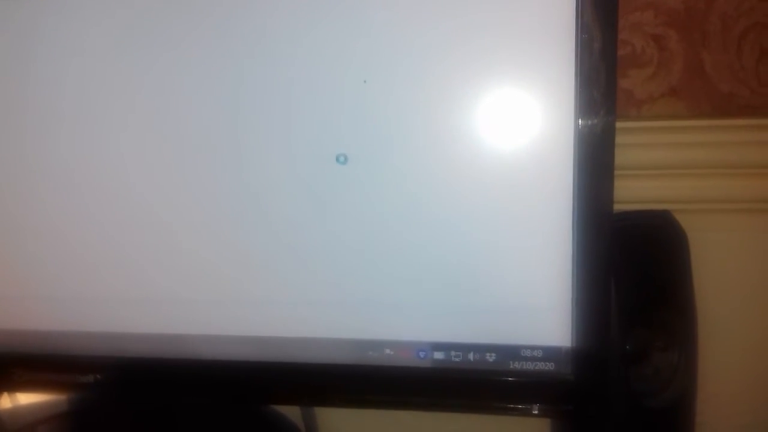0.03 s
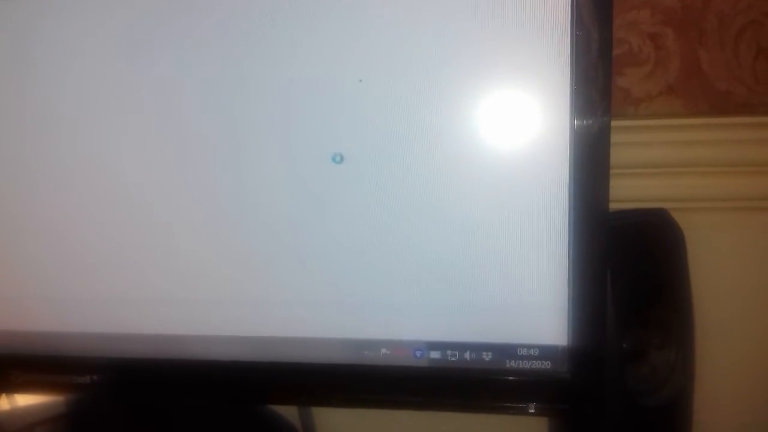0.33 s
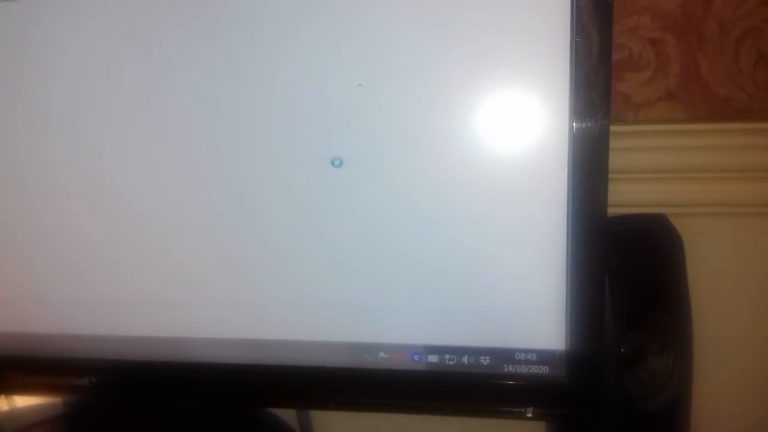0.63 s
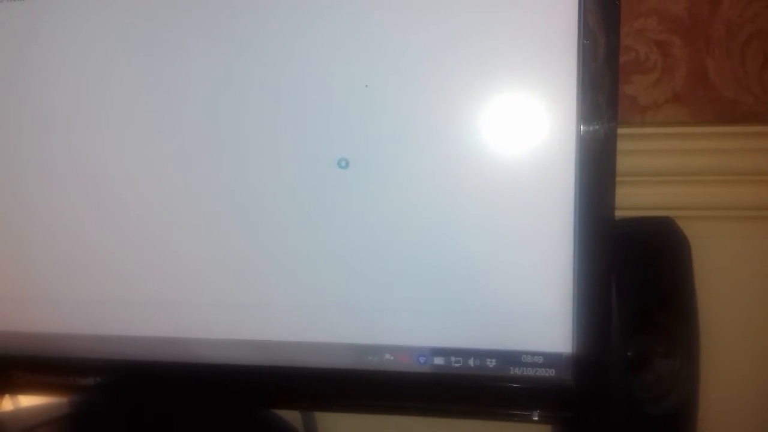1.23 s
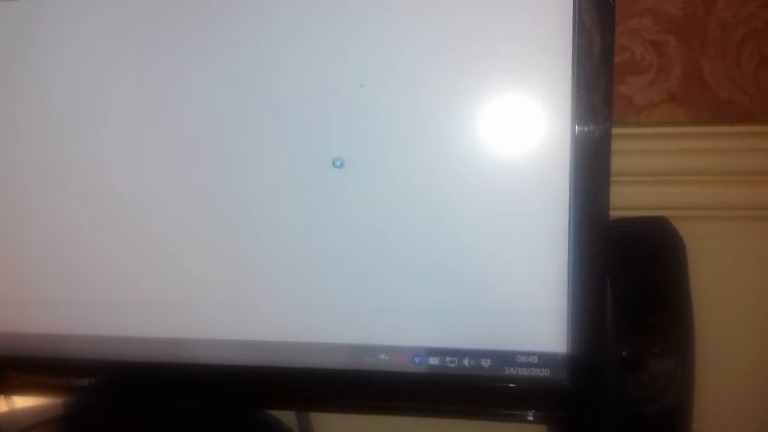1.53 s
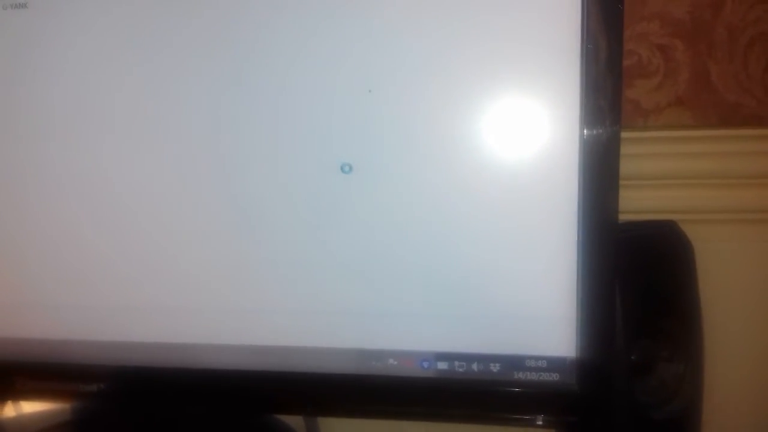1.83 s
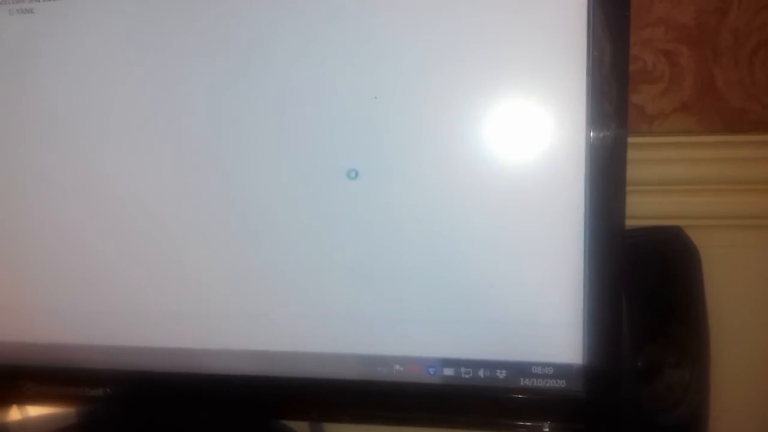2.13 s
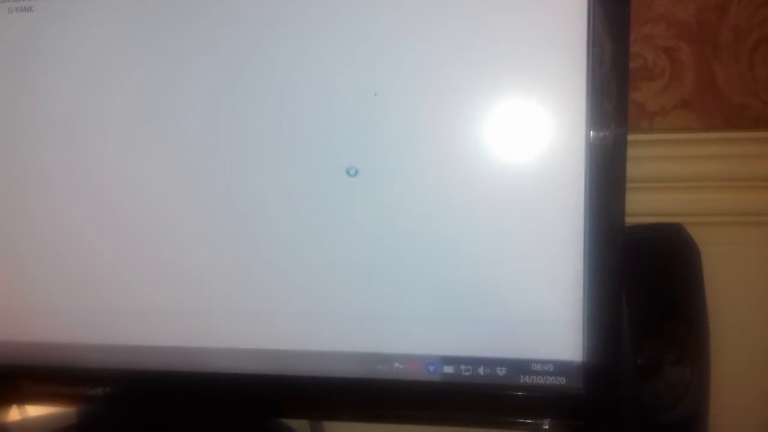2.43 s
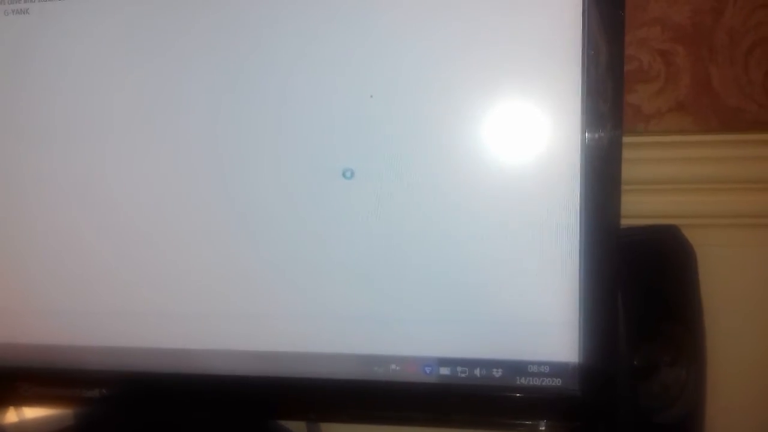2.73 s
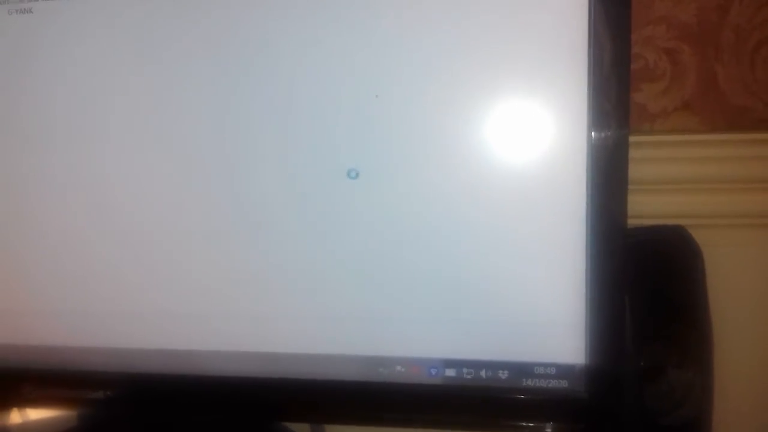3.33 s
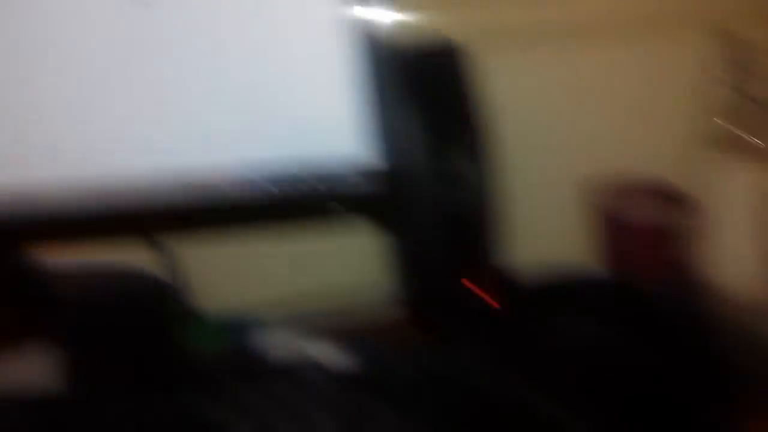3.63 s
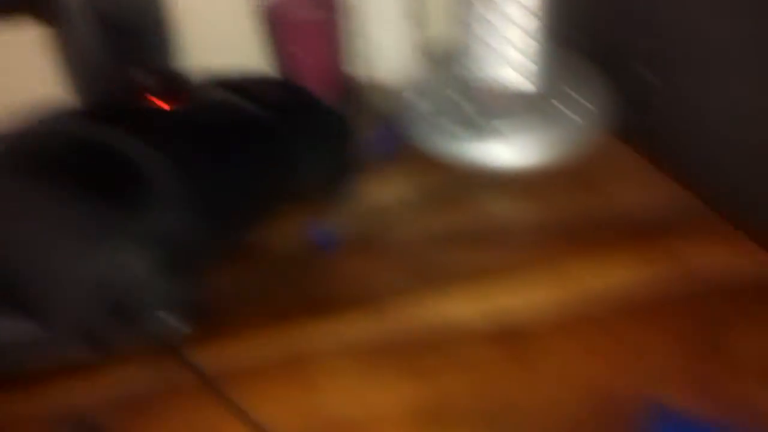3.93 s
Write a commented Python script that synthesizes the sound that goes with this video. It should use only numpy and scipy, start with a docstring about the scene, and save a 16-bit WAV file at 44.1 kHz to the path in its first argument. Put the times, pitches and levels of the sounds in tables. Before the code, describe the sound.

A hard drive clicks once over the faint, steady fan hiss of a computer in a small room. Later, fingers bump and rub the hand-held camera, its plastic case creaks right at the microphone, and the drive clicks again.

```python
"""Hard drive clicking in a small room

A hard drive clicks twice over the steady fan hiss of a computer, heard from a hand-held camera.
Each click is a faint release, the head arm striking its stop, and a tiny tick as it settles.
Right at the microphone, the camera is nudged, then swung away: fingers bump and rub it
and its plastic case creaks."""
import sys
import numpy as np
from scipy import signal
from scipy.fft import rfft, irfft, next_fast_len
from scipy.io import wavfile

SR = 44100
rng = np.random.default_rng(int(sys.argv[2]) if len(sys.argv) > 2 else 0)


def dump(signal):
    """Clip the signal to [-1, 1] and save it as 16-bit WAV at the path in sys.argv[1]."""
    limited = np.clip(np.atleast_2d(signal).T, -1, 1)
    pcm = np.round(limited * 32767).astype(np.int16)
    wavfile.write(sys.argv[1], SR, pcm)


N = 176400
SNAP_LEAD_S = .01  # build-up of a snap before it lets go


def amp(db):
    """Decibels to gain."""
    return 10 ** (np.asarray(db) / 20)


def unit_rms(x):
    """Scales to rms 1."""
    return x / np.sqrt(np.mean(x ** 2) + 1e-20)


def unit_energy(x):
    """Scales to energy 1."""
    return x / np.linalg.norm(x, axis=-1, keepdims=True)


def read(points, hz):
    """Reads a table on a log-frequency axis."""
    f, value = np.transpose(points)
    return np.interp(np.log(hz + 1), np.log(f + 1), value)


def level(points):
    """Gain over time from a dB curve, silent before it starts."""
    return amp(np.interp(np.arange(N) / SR, *np.transpose(points), left=-200))


def add(mix, s, sound):
    """Adds a sound to the mix at s seconds."""
    part = mix[max(round(s * SR), 0):][:len(sound)]
    part += sound[:len(part)]


def sine(hz, t):
    """A sine of random phase."""
    return np.sin(2 * np.pi * (hz * t + rng.random()))


def burst(t, t60):
    """Noise that falls 60 dB in t60 seconds."""
    return rng.standard_normal(len(t)) * amp(-60 * t / t60)


def colour(x, points):
    """Causal filter with the given spectrum."""
    size = next_fast_len(len(x) + 4096)
    log_gain = np.log(amp(read(points, abs(np.fft.fftfreq(size, 1 / SR)))))
    minimum_phase = np.exp(np.conj(signal.hilbert(log_gain)))
    return np.fft.ifft(np.fft.fft(x, size) * minimum_phase).real[:len(x)]


def low_cut(x, hz):
    """Rolls off the bass below hz."""
    return signal.sosfilt(signal.butter(2, hz, "high", fs=SR, output="sos"), x)


def room(x):
    """What comes back to the microphone: quick desk reflections and a weaker tail from the walls."""
    # decay of the small room (frequency [Hz], t60 [s])
    decay = [(300, 0.24), (1500, 0.47), (4000, 0.38), (10000, 0.39)]
    t = np.arange(SR // 2) / SR
    desk = burst(t, t60=.1)
    hz, frame_s, bands = signal.stft(rng.standard_normal(len(t)), SR, nperseg=256)
    walls = signal.istft(bands * amp(-60 * frame_s / read(decay, hz)[:, None]), SR)[1][:len(t)]
    tail = unit_energy(desk) + amp(-4) * unit_energy(walls)
    return signal.fftconvolve(x, unit_energy(tail * (t > .003)))[:N]


def microphone_fizz():
    """Each microphone channel has its own faint self-noise."""
    # colour of the self-noise (frequency [Hz], gain [dB])
    spectrum = [(20, -8), (100, -3), (4000, -2), (5200, -2.5), (7000, 0), (9300, 0), (10000, -9),
                (10900, 0), (14400, 0), (15000, -7), (15600, 0)]
    fizz = [unit_rms(colour(noise, spectrum)) for noise in rng.standard_normal((2, N))]
    return amp(-75.6) * np.array(fizz)


def computer():
    """The room tone: slightly wavering fan hiss, wider in the treble, and a faint mains hum."""
    # colour of the fan hiss (frequency [Hz], gain [dB])
    spectrum = [(15, -16), (30, -5.5), (60, -1), (120, 0.5), (155, -4), (190, -1.5), (230, -4.5), (400, -5),
                (800, -8), (1500, -9.5), (2200, -13.5), (3000, -16), (4000, -22), (5000, -32.5),
                (7000, -29), (16000, -59)]
    # share of the hiss that differs between left and right (frequency [Hz], gain [dB])
    width = [(30, -27), (120, -11), (500, -7), (1500, -4.5), (4000, -1)]
    # mains hum (frequency [Hz], rms level [dB])
    mains = [(120, -82)]
    t = np.arange(N) / SR
    waver_db = -.75 * unit_rms(sum(sine(hz, t) / np.sqrt(hz) for hz in np.geomspace(.5, 20, 20)))
    mid, side = (unit_rms(colour(noise, spectrum)) for noise in rng.standard_normal((2, N)))
    air = mid + np.array([[1], [-1]]) * colour(side, width)
    hum = sum(amp(db) * np.sqrt(2) * sine(hz, t) for hz, db in mains)
    return amp(-67.5 + waver_db) * air + hum


def snap(relax_ms, bright_hz):
    """Stress in the camera case builds, lets go at once and relaxes."""
    # what the case passes to the microphone (frequency [Hz], gain [dB])
    case_path = [(300, 3.5), (1000, 1), (2100, 6), (3400, 1), (4900, -2.5), (6500, 9), (9000, 6.5),
                 (14000, 9)]
    half = round(SNAP_LEAD_S * SR)
    ms = np.arange(-half, half + 1) * 1000 / SR
    stress = -np.sign(ms) * np.exp(-abs(ms) / relax_ms)
    hz = np.fft.rfftfreq(len(ms), 1 / SR)
    response = amp(read(case_path, hz)) / (1 + (hz / bright_hz) ** 3.36)
    pulse = irfft(rfft(stress) * response, len(ms))
    return pulse / pulse.max()


def finger_bumps():
    """Fingers land on the camera: each gives a soft thump and a fingertip tap."""
    # bumps (time [s], thump level [dB], pitch [Hz], ring [ms], tap level [dB], tap brightness [Hz])
    bumps = [(.473, -56.5, 129, 3.5, -70, 600), (0.7163, -39, 132, 1.46, -50.5, 1180),
             (3.472, -44.5, 119, 13, -48, 900), (3.5003, -31, 120, 1.7, -39.5, 900),
             (3.514, -30.5, 111, 5, -34.5, 1400), (3.5448, -36, 230, 1.4, -46, 1600),
             (3.5913, -26, 345, 1.54, -44, 700), (3.5961, -27, 122, 1.5, -40, 700),
             (3.703, -32, 115, 4.3, -36, 1100), (3.763, -51, 294, 0.93, -56, 1000),
             (3.809, -45, 133, 2.6, -61, 1800), (3.9905, -62, 192, 2.3, -53.5, 1500)]
    t, out = np.arange(SR // 10) / SR, np.zeros(N)
    for s, db, hz, ring_ms, tap_db, tap_hz in bumps:
        age = t * 1000 / ring_ms
        thump = age * np.exp(-age) * np.sin(2 * np.pi * hz * t + 1)
        add(out, s, amp(db) * thump / abs(thump).max())
        add(out, s - SNAP_LEAD_S + .00084, amp(tap_db) * snap(relax_ms=.34, bright_hz=tap_hz))
    return out


def hard_drive():
    """Out in the room, the arm releases, strikes its stop, rebounds and settles; the casing rings."""
    # arm strikes (time [s], crack level [dB], rebound drop [dB], ring level [dB], tilt [dB/octave])
    strikes = [(1.6293, -22.5, 9, -19.5, -.8), (3.858, -21, 4, -13.5, .7)]
    # modes of the drive casing (frequency [Hz], level [dB], t60 [s])
    casing = [(712, -16, .13), (785, -11, .1), (890, -8, .11), (1325, -13, .11), (1490, -14, .11),
              (1682, -12, .12), (1778, -14, .14), (1940, -11, .09), (2015, -9, .22), (2036, 0, .08),
              (2672, -18, .08), (3555, -17, .14), (6500, -32, .1), (8200, -25, .04)]
    # colour of the arm's crack on its stop (frequency [Hz], gain [dB])
    crack_colour = [(200, -28), (580, -11), (750, 2), (930, 3), (1060, -7), (1350, 2), (2030, 0),
                    (2200, -7), (2600, -6), (3050, -13), (3600, -11), (4600, -23), (6200, -18), (6800, -23),
                    (8200, -19), (8900, -32), (12000, -44), (16000, -55)]
    # resonance of the small ticks (frequency [multiple of their pitch], gain [dB])
    tick_skirt = [(.6, -20), (.85, -9), (1, 0), (1.15, -11), (1.6, -20), (3, -45)]
    rebound_s, pivot_hz = .0045, 1800
    release, settle = (-.0075, -46, 3580), (.126, -50, 4550)  # (lag [s], level [dB], pitch [Hz])
    t, cracks, rings = np.arange(SR // 3) / SR, np.zeros(N), np.zeros(N)
    ring = unit_energy(sum(amp(db - 60 * t / t60) * sine(hz, t) for hz, db, t60 in casing))
    ring *= 1 - np.exp(-t / .0011)
    for s, db, drop_db, ring_db, tilt in strikes:
        tone = [(hz, gain + tilt * np.log2(hz / pivot_hz)) for hz, gain in crack_colour]
        for lag, blow_db in (0, db), (rebound_s, db - drop_db):
            chatter = amp(-4) * unit_energy(burst(t, t60=.011))
            crack = colour((t == 0) + chatter, tone)
            add(cracks, s + lag, amp(blow_db) * unit_energy(crack))
        add(rings, s, amp(ring_db) * ring)
        for lag, tick_db, hz in release, settle:
            tick = colour(burst(t, t60=.018), [(hz * ratio, gain) for ratio, gain in tick_skirt])
            add(rings, s + lag, amp(tick_db) * unit_energy(tick))
    return cracks + rings + room(cracks)


def grip_rumble():
    """The grip shifts on the camera and a narrow band of deep rumble reaches the microphone."""
    # swell of the rumble (time [s], level [dB])
    swell = [(2.0, -92), (2.07, -65), (2.13, -65), (2.2, -65), (2.35, -78.5), (2.5, -77), (2.8, -88)]
    centre_hz, half_width_hz = 43, 5
    hz = np.fft.rfftfreq(N, 1 / SR)
    resonance = 1 / (1 + ((hz - centre_hz) / half_width_hz) ** 2)
    rumble = irfft(rfft(rng.standard_normal(N)) * resonance, N)
    return level(swell) * unit_rms(rumble)


def finger_rub():
    """Skin drags over the camera case in a dense run of tiny, uneven grains."""
    # course of the rubbing (time [s], level [dB])
    swell = [(3.45, -90), (3.475, -70), (3.5, -61.5), (3.53, -53.5), (3.555, -52.5), (3.585, -55),
             (3.615, -55), (3.65, -57.5), (3.69, -47.5), (3.725, -48), (3.755, -59), (3.795, -67),
             (3.806, -63), (3.812, -55.5), (3.835, -62.5), (3.96, -66), (4.0, -56.5)]
    # colour of the grains (frequency [Hz], gain [dB])
    spectrum = [(30, -20), (120, -2), (500, 0), (900, -4), (1700, -3), (2800, -14), (4500, -29),
                (8000, -35), (16000, -60)]
    grains_per_s = 1800
    grains = (rng.random(N) < grains_per_s / SR) * rng.choice([-1, 1], N)
    grain_db = 3.5 * np.minimum(rng.exponential(1, N), 4)
    return level(swell) * unit_rms(colour(grains * amp(grain_db), spectrum))


def case_creak():
    """The plastic case sticks and slips right at the microphone, one snap per slip."""
    # slips of the plastic (time [s], level [dB], relaxation [ms], brightness [Hz])
    slips = [(3.5622, -32.5, 0.16, 6540), (3.6066, -25.5, 0.28, 4400), (3.6446, -46, 0.073, 5000),
             (3.6577, -45, 0.043, 4000), (3.6672, -34.5, .14, 4000), (3.6698, -22.5, 0.38, 2630),
             (3.6779, -34, 0.53, 1200), (3.6806, -28.5, 0.32, 1200), (3.6828, -25.5, 0.55, 1930),
             (3.6971, -33, 0.17, 2300), (3.6993, -22.5, .12, 2600), (3.704, -29, 1, 1200),
             (3.7082, -26, 0.32, 2200), (3.7094, -19, 0.31, 2020), (3.7105, -19, 0.48, 2170),
             (3.7125, -13, 0.12, 2250), (3.714, -23, 0.19, 2350), (3.7154, -20.5, 0.067, 2530),
             (3.7211, -18.5, .22, 2700), (3.7253, -20, 0.13, 2600), (3.7306, -39, 0.073, 4540)]
    out = np.zeros(N)
    for s, db, relax_ms, bright_hz in slips:
        add(out, s - SNAP_LEAD_S, amp(db) * snap(relax_ms, bright_hz))
    return out


def scene():
    """The roomy drive and the close, almost dry handling sit in the centre of a stereo hiss."""
    fizz = microphone_fizz()
    drive = hard_drive()
    handling = low_cut(finger_bumps() + finger_rub() + case_creak(), hz=56)
    return fizz + drive + handling + grip_rumble() + amp(-25) * room(handling) + computer()


def record(dry):
    """The recorder cuts the deepest bass and the highest treble."""
    treble_cut = signal.firwin(511, 15950, window=("kaiser", 9), fs=SR)
    return signal.oaconvolve(low_cut(dry, hz=28), treble_cut[None], "same")


dry = scene()
out = record(dry)
dump(out)
```